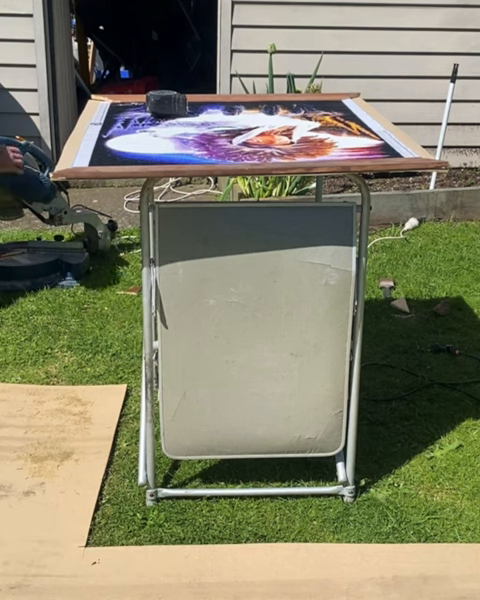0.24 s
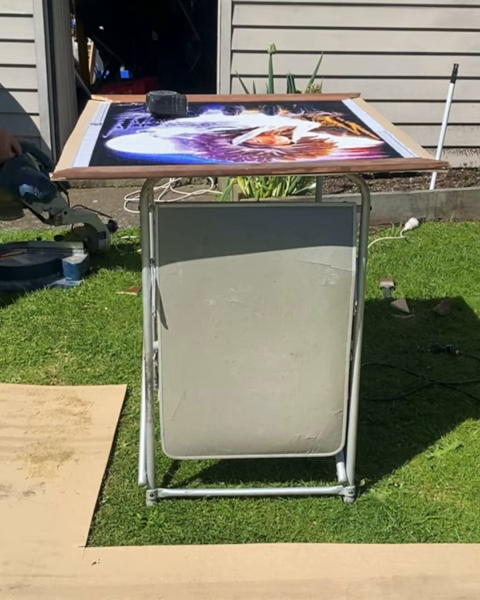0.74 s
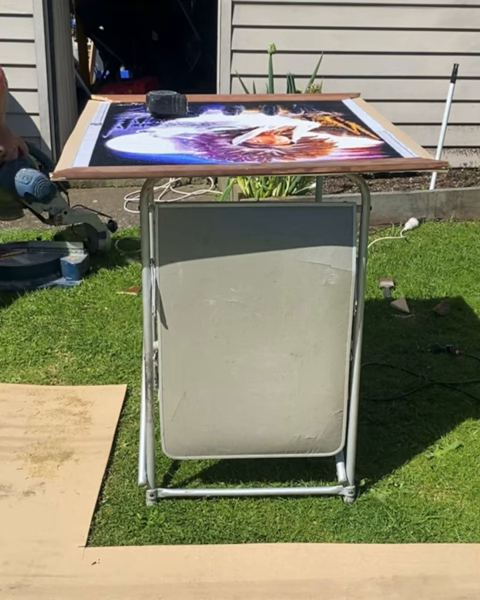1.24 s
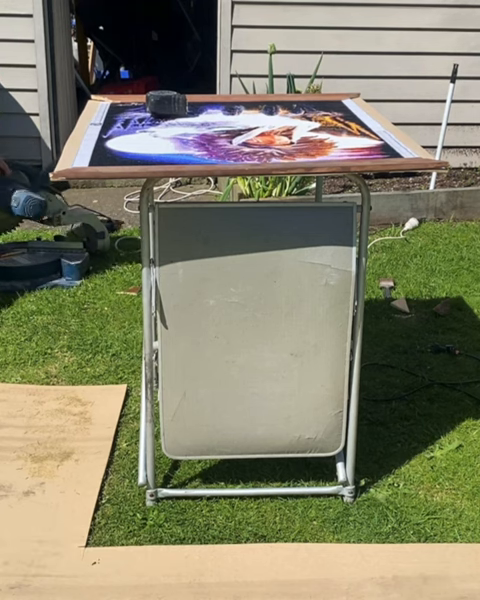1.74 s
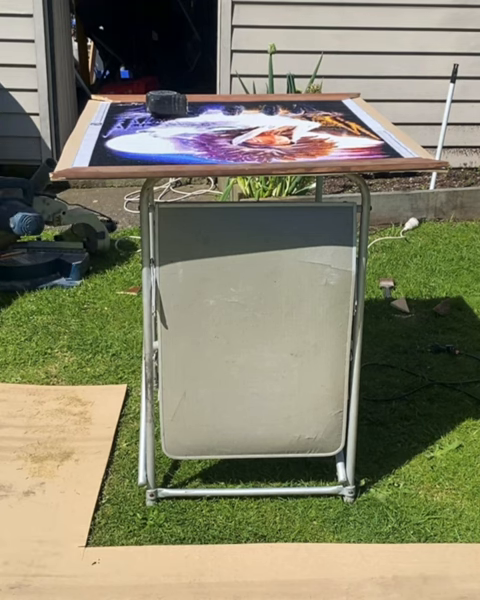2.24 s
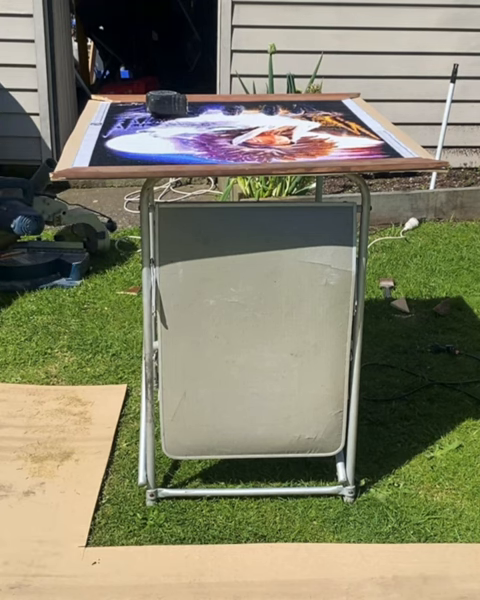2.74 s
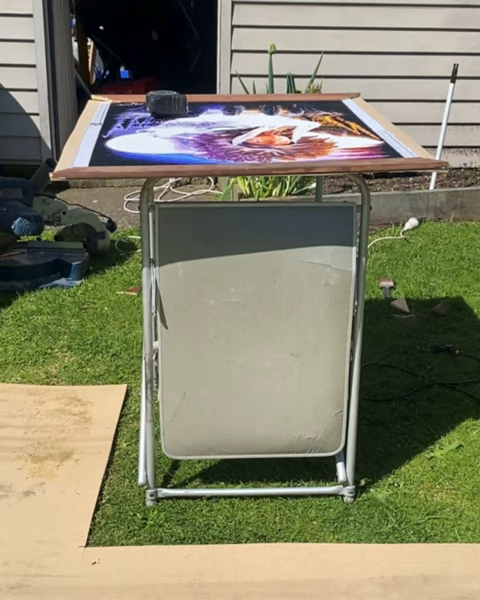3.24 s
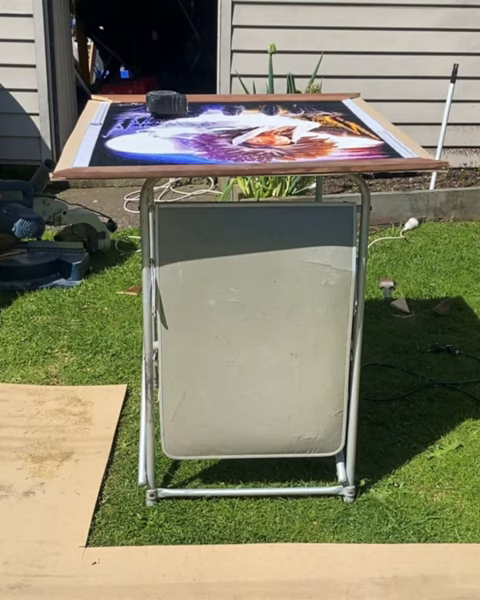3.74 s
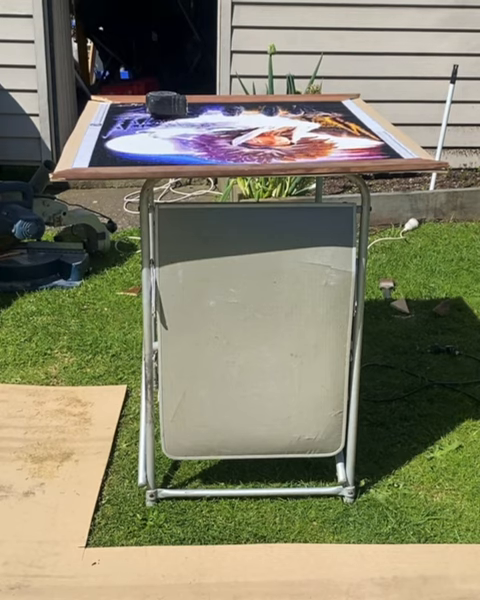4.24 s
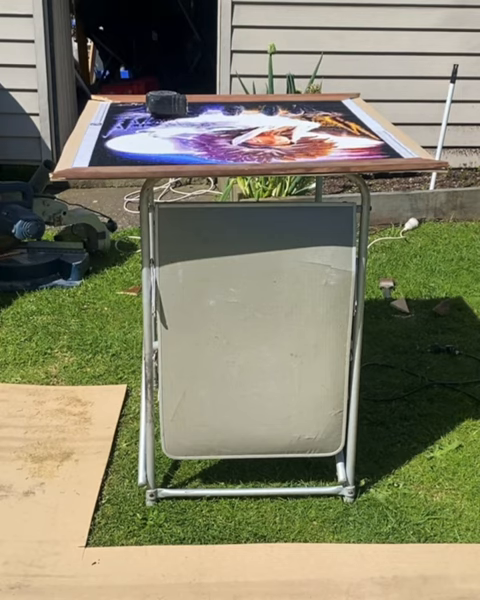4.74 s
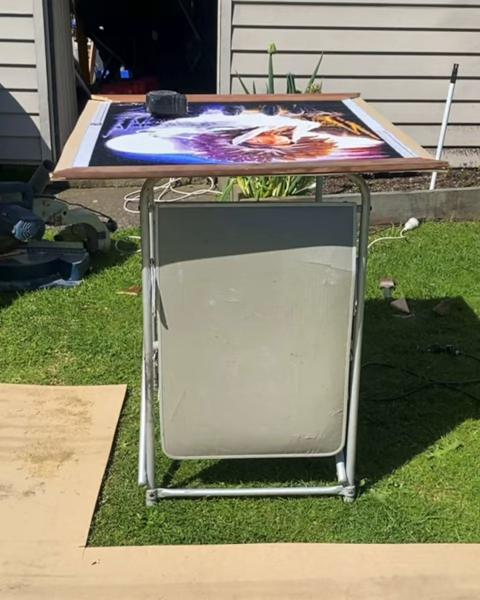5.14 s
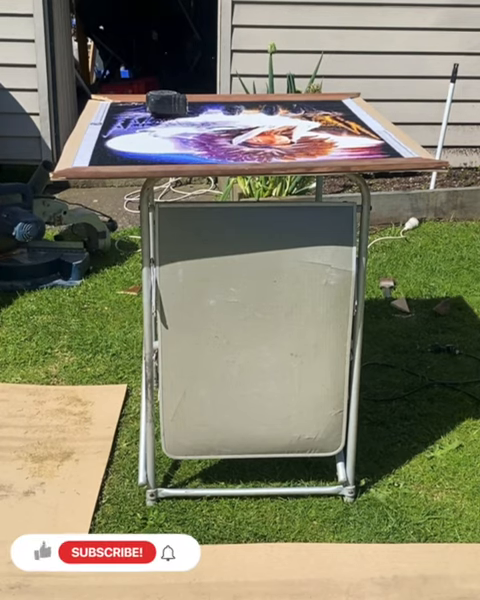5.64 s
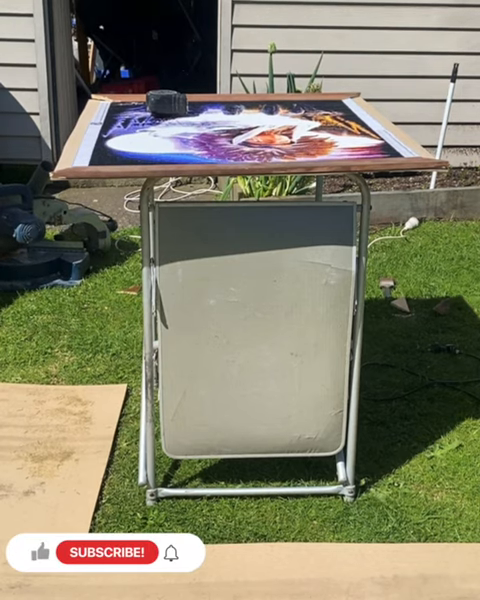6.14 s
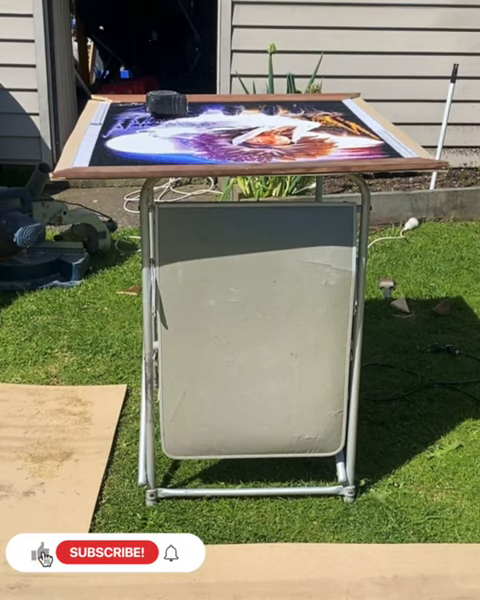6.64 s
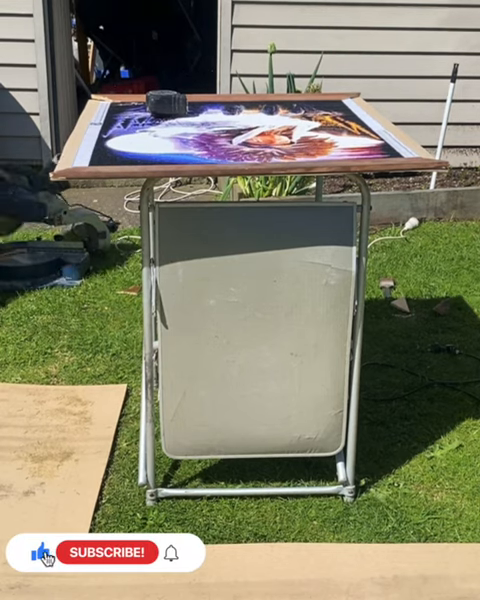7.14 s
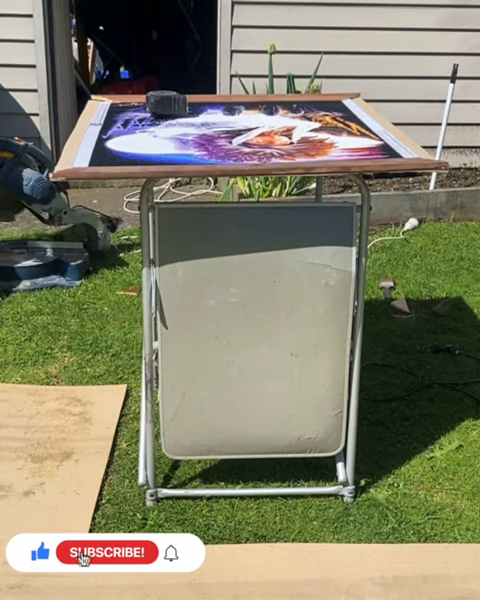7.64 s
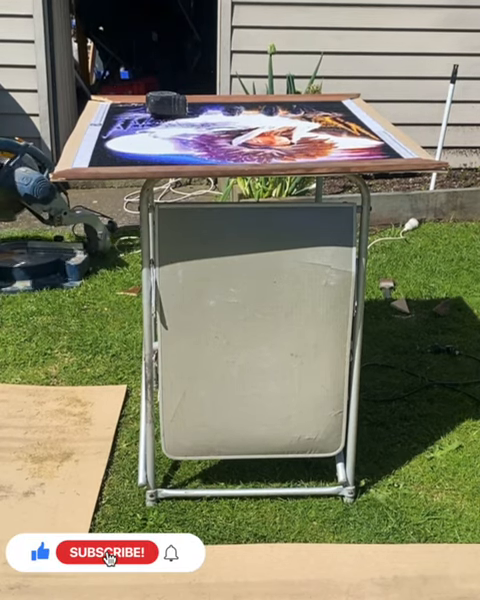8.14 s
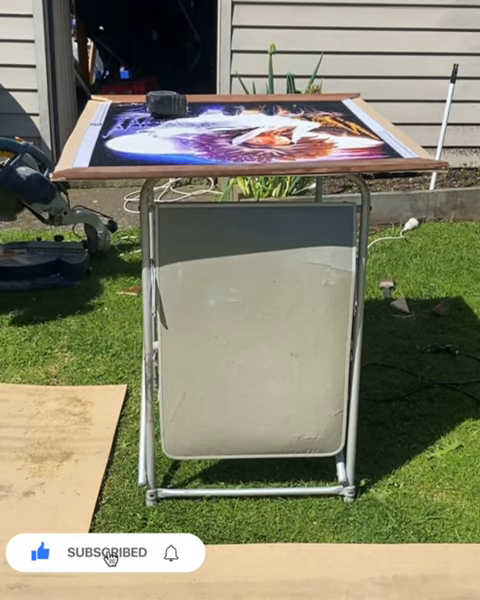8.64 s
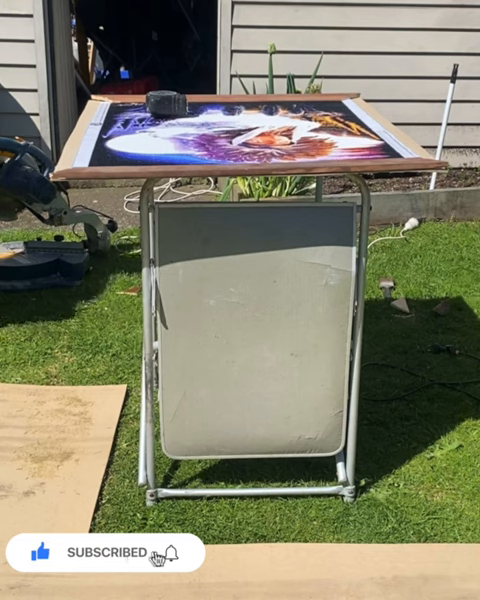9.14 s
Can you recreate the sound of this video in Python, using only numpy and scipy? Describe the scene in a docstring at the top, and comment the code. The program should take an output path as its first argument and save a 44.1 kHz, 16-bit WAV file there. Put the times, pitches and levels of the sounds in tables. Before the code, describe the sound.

A faint low hum and soft open air, then a saw arm slides and clacks twice with a short metallic ring. The electric motor kicks in with a rattling slam and rises steeply; toothy whine, rasping wood and shifting high squeals follow for about three seconds. After release, rattly gears pulse and slowly sink in pitch. Near stereo microphone in a yard, slight wall reflection.

```python
"""A mitre saw, to the left on a lawn: its motor kicks in and spins up, and the 40-tooth blade whines through
a strip of frame moulding and runs free; on release the gears coast down with a throb.
Beforehand its arm and guard clack twice as it is pulled down. Tones locked to the blade's and motor's turns,
coloured noise and decaying resonances make the saw; random tails make the answer of a shed wall.
Behind it a low background drone sinks while the saw cuts, with faint steady tones and stirring outdoor air."""
import sys
import numpy as np
from scipy import signal
from scipy.fft import rfft, irfft, next_fast_len
from scipy.io import wavfile
from scipy.ndimage import uniform_filter1d, map_coordinates

SR = 44100
rng = np.random.default_rng(int(sys.argv[2]) if len(sys.argv) > 2 else 0)


def wav_record(signal):
    """Record a signal, one row per channel, as 16-bit PCM in the file named by sys.argv[1]."""
    frames = np.transpose(np.atleast_2d(signal))
    bounded = np.clip(frames, -1, 1)
    # unit amplitude maps onto the largest positive 16-bit level
    quanta = np.round(bounded * 32767).astype(np.int16)
    wavfile.write(sys.argv[1], SR, quanta)


N = 413658
T = np.arange(N) / SR  # s
ON_S, OFF_S = 3.275, 7.04  # trigger pressed and released
TEETH, GEAR_RATIO, PINION = 40, 4.97, 9  # blade teeth, motor turns per blade turn, pinion teeth


def amp(db):
    """Logarithmic level: decibels to linear gain."""
    return 10 ** (np.asarray(db) / 20)


def unit(x):
    """Power normalisation: scale to rms 1."""
    return x / np.sqrt(np.mean(x ** 2) + 1e-20)


def steady(x):
    """Running normalisation: x is held at rms 1 from moment to moment."""
    return x / np.sqrt(np.abs(uniform_filter1d(x ** 2, size=4000)) + 1e-9)


def along(points, hz):
    """Logarithmic pitch axis: (frequency [Hz], value) points interpolated at hz."""
    f, v = np.transpose(points)
    return np.interp(np.log(hz + 1), np.log(f + 1), v)


def envelope(start, hold, attack, release):
    """Attack and decay: a straight rise, a hold and an exponential fall, all in seconds."""
    rise = np.clip((T - start) / attack, 0, 1)
    return rise * np.exp(-np.maximum(T - start - attack - hold, 0) / release)


def level(rows):
    """Amplitude modulation: (time [s], level [dB]) rows as a gain, faded out beyond their ends."""
    s, db = np.transpose(rows)
    gate = np.interp(T, [s[0] - .015, s[0], s[-1], s[-1] + .04], [0, 1, 1, 0])
    return gate * amp(np.interp(T, s, db))


def wobble(rate):
    """Slow random modulation: a smooth curve with rate knots a second."""
    coarse = T[::16]
    knots = rng.standard_normal(int(T[-1] * rate) + 4)
    return np.interp(T, coarse, map_coordinates(knots, [coarse * rate]))


def filtered(x, response):
    """Linear filtering: the spectrum of x times a response of frequency."""
    m = next_fast_len(N + SR // 4)
    return irfft(rfft(x, m) * response(np.fft.rfftfreq(m, 1 / SR)), m)[..., :N]


def resonance(hz, centre_hz, width_hz):
    """Resonance curve: gain 1 at its centre and a half at the edges of its width."""
    return 1 / (1 + ((hz - centre_hz) / (width_hz / 2)) ** 2)


def shaped(x, spectrum, lo_hz=20, hi_hz=18000):
    """Spectral colouring: x through one band of a spectrum, at rms 1."""
    def response(f):
        edges = (1 + (lo_hz / (f + 1)) ** 8) * (1 + (f / hi_hz) ** 8)
        return amp(along(spectrum, f)) / np.sqrt(edges)
    return unit(filtered(x, response))


def noise():
    """White noise: equal power at all frequencies."""
    return rng.standard_normal(N)


def tones(turns, orders, slip, rate, waver_db=2):
    """Order tones: lines on multiples of a turn, wavering in level and slipping in phase (radians)."""
    total = 0
    for k, db in orders:
        phase = 2 * np.pi * (np.round(k) * turns + rng.random()) + slip * wobble(rate)
        total = total + amp(db + waver_db * wobble(7.0)) * np.sin(phase)
    return unit(total)


def throb(turns, depth_db):
    """Periodic modulation: a swell once a turn, at rms 1."""
    return unit(amp(depth_db * np.cos(2 * np.pi * turns)))


def each_turn(turns, drift):
    """Cyclic excitation: a rough pattern repeats every turn and is renewed drift times a second."""
    pattern = rng.standard_normal((120, 480))
    return map_coordinates(pattern, [drift * T, 480 * turns], mode="grid-wrap", order=2)


def echoes(x, t60s, delay):
    """Reverberant decay: a stereo random tail in which each frequency dies at its own speed."""
    hz, t, z = signal.stft(rng.standard_normal((2, SR // 2)), SR, nperseg=256)
    decay = amp(-60 * t / along(t60s, hz)[:, None])
    tail = signal.istft(z * decay, SR, nperseg=256)[1]
    delayed = np.pad(x, (int(delay * SR), 0))[None]
    return signal.fftconvolve(delayed, tail / np.linalg.norm(tail[0]), axes=1)[:, :N]


def rattle(start, count, bands_db, step_db, gap, widen):
    """Repeated impact: (time, band levels) contacts; each gap is widen times the last, levels step."""
    return [(start + gap * sum(widen ** np.arange(k)), np.add(bands_db, k * np.array(step_db)))
            for k in range(count)]


def knocks(contacts, colour, t60s):
    """Impact excitation: each contact shakes three bands (thud, clack, tick) and leaves a soft tail."""
    t = T[:SR // 2]
    tail = amp(-21 - 60 * t / 0.36)
    attack = 1 - np.exp(-t / 0.0013)
    shake = np.zeros((3, N))  # power per band
    for s, bands_db in contacts:
        hits = [(amp(db) * (amp(-60 * t / t60) + tail) * attack) ** 2 for db, t60 in zip(bands_db, t60s)]
        shake[:, round(s * SR):][:, :len(t)] += hits
    bands = [(80, 1000), (1000, 3400), (3400, 18000)]  # Hz
    return sum(np.sqrt(power) * shaped(noise(), colour, *band) for power, band in zip(shake, bands))


# Spectrum of the outdoor air and low rumble: (frequency [Hz], relative level [dB])
YARD_SPECTRUM = [(25, -18.5), (69, -6), (125, -19.5), (621, -33.5), (1800, -46), (2750, -45), (3100, -55),
                 (7090, -67.5), (15000, -87)]
# Level of the low background drone: steady, then sinking while the saw cuts: (time [s], relative level [dB])
LOW_DRONE_LEVEL = [(0.0, -45), (4.31, -45), (6.58, -60), (9.38, -59)]
# Pitch of the low drone: (time [s], frequency [Hz])
DRONE_PITCH = [(1.3, 59.26), (2.3, 63.57)]
# Faint tones: (frequency [Hz], relative level [dB])
YARD_TONES = [(120, -52), (1464, -80)]


def yard(rumble_db=-2, drone_db=1.5, air_db=-55, side_db=-14, stir_db=-1.4):
    """Ambient noise: a low drone and faint tones, sinking together, sound under gently stirring outdoor air."""
    mid, side = [shaped(noise(), YARD_SPECTRUM, lo_hz=42, hi_hz=154.0) for _ in range(2)]
    drone_turns = np.cumsum(np.interp(T, *np.transpose(DRONE_PITCH))) / SR
    drone = amp(drone_db) * np.sin(2 * np.pi * drone_turns + .6 * wobble(6.6))
    # each side has its own air and shares some
    air = np.array([shaped(noise(), YARD_SPECTRUM, lo_hz=132) for _ in range(2)])
    air = air + 0.52 * shaped(noise(), YARD_SPECTRUM, lo_hz=132.8)
    upper = filtered(air, lambda f: f / (f + 1200))
    air = unit((air - upper) * amp(stir_db * wobble(14)) + upper * amp(stir_db * wobble(15)))
    hum = sum(amp(db + 2 * wobble(6)) * np.sin(2 * np.pi * hz * T + wobble(3.3)) for hz, db in YARD_TONES)
    low_level = level(LOW_DRONE_LEVEL)
    rumble = amp(rumble_db) * mid + amp(side_db) * np.array([side, -side])
    return low_level * (drone + rumble) + amp(air_db) * air + hum * low_level / low_level.max()


# Decay of the shed wall's answer: (frequency [Hz], time to fall 60 dB [s])
WALL_DECAY = [(150, 0.34), (1500, 0.62), (6000, 0.54), (14000, 0.0692)]


def wall(saw, wall_db=-17):
    """Reflection: the shed wall returns the saw 20 ms late as a tail."""
    return amp(wall_db) * echoes(saw, WALL_DECAY, delay=.02)


def scatter(saw, near_db=-9):
    """Scattering: nearby things return a short tail, opposite in sign at the two sides."""
    tail = echoes(saw, [(200, 0.069), (8000, 0.1573)], delay=.002)[0]
    return amp(near_db) * np.array([[1.], [-1.]]) * filtered(tail, lambda f: f / (f + 500))


# Knocks and rattles of arm, guard and trigger:
# (time [s], contacts [count], relative level [dB], thud over it [dB], tick over it [dB])
CLACKS = [(1.257, 1, -50.5, 0.5, -24), (1.365, 1, -35.5, 1, -11.5), (1.3984, 3, -32, 1.5, -15.5),
          (1.4422, 2, -11, -3.5, -0.5), (1.454, 1, -15, -7.5, 4.5), (1.4627, 2, -12, -9, -3.5),
          (1.673, 2, -12.5, -9, -4.5), (1.694, 4, -12.5, -12, -3.5), (1.724, 3, -14, -4.5, -8),
          (1.848, 1, -30, -1, -5.5), (1.9444, 1, -39.5, 4.5, -10), (2.104, 2, -37.5, 1, -4.5),
          (2.865, 1, -57, 0, -20.5), (3.155, 3, -57, 7, -23), (7.057, 2, -32.5, -13, 11)]


def clack_contacts():
    """Repeated impact: parts rattle against their stops, duller with each contact."""
    contacts = []
    for s, count, db, thud_db, tick_db in CLACKS:
        bands_db = (db + thud_db, db, db + tick_db)
        contacts += rattle(s, round(count), bands_db, step_db=(.7, -.3, -1.0), gap=.0075, widen=0.81)
    return contacts


# Modes of the arm and guard: (frequency [Hz], relative level [dB], time to fall 60 dB [s])
ARM_MODES = [(642, -9.5, .14), (990, -7, 0.13), (1255, 1.5, 0.11), (1450, -35.5, 1.9), (1950, -7, 0.313),
             (2780, -4.5, .15), (2870, -34, 1.2), (4500, -14, 0.34), (6570, -21.5, 0.15)]


def arm_ring(contacts):
    """Modal ringing: each contact sets off decaying sines, slightly varied in pitch and level."""
    t = T[:SR // 2]
    ring = np.zeros(N)
    for s, bands_db in contacts:
        modes = sum(amp(db + rng.normal(0, 1.0) - 60 * t / t60)
                    * np.sin(2 * np.pi * hz * rng.normal(1, .002) * t) for hz, db, t60 in ARM_MODES)
        ring[round(s * SR):][:len(t)] += amp(bands_db[1]) * modes
    return ring


# Colour of the arm's contacts and sliding: (frequency [Hz], relative level [dB])
CONTACT_SPECTRUM = [(100, -18), (280, -22.5), (450, -14.5), (900, -11), (1400, -7.5), (1750, -12.5),
                    (2700, -10.5), (3250, -14.5), (4500, -9.5), (5850, -13), (6600, -4.5), (7600, -18.5),
                    (11000, -23), (15500, -40.5)]
# The arm slides on its rails: (time [s], length [s], rub level [dB], hiss level [dB])
SLIDES = [(0.007, 0.13, -68, -72.5), (.38, 0.09, -76, -86), (1.251, 0.077, -56.5, -75.5),
          (1.36, .05, -42.5, -46.5)]


def arm_slides():
    """Sliding friction: gritty noise in a low rub and a high hiss as the arm moves on its rails."""
    grit = noise() * amp(2.7 * wobble(160))
    rub = shaped(grit, CONTACT_SPECTRUM, lo_hz=299.6, hi_hz=1550)
    hiss = shaped(grit, CONTACT_SPECTRUM, lo_hz=2306)
    return sum(envelope(s, length, attack=0.007, release=0.037) * (amp(rub_db) * rub + amp(hiss_db) * hiss)
               for s, length, rub_db, hiss_db in SLIDES)


def handling(knock_db=-4, ring_db=-13):
    """Impact and friction: the arm slides, rattles against its stops and rings."""
    contacts = clack_contacts()
    knocking = knocks(contacts, CONTACT_SPECTRUM, t60s=(.08, .06, .045))
    return amp(knock_db) * knocking + amp(ring_db) * arm_ring(contacts) + arm_slides()


def base(thunk_s=1.733, thunk_db=-5, thunk_hz=639, t60=0.13):
    """Delayed resonance: the heavy base answers the second clack with a low ring that builds up slowly."""
    t = np.maximum(T - thunk_s, 0)
    swell = amp(thunk_db - 60 * t / t60) * (1 - np.exp(-t / .02)) ** 2
    return swell * np.sin(2 * np.pi * thunk_hz * t + .4 * wobble(90))


# Colour of the jolted motor housing: (frequency [Hz], relative level [dB])
HOUSING_SPECTRUM = [(88, -48.5), (150, -22), (300, -25.5), (818, -2), (3540, -23.5), (7210, -25.5),
                    (8410, -38), (15000, -48)]
# Mains hum: (frequency [Hz], relative level [dB])
MAINS_TONES = [(100, -10), (150, 1), (200, -20)]


def kick(hum_db=-40, swell_db=-32, swell_s=3.585, swell_width_s=0.046):
    """Impact and inrush: gear teeth slam at switch-on; mains hums, swelling once, while current is high."""
    contacts = rattle(ON_S, count=9, bands_db=(-15, -14.5, -16), step_db=(-.45, -1.2, -2.1),
                      gap=0.0095, widen=1.13)
    current = amp(hum_db) * envelope(ON_S, hold=0.21, attack=.04, release=0.5)
    current = current + amp(swell_db) * np.exp(-((T - swell_s) / swell_width_s) ** 2)
    mains = sum(amp(db) * np.sin(2 * np.pi * hz * T + 0.25 * wobble(7.4)) for hz, db in MAINS_TONES)
    return knocks(contacts, HOUSING_SPECTRUM, t60s=(.11, .07, .06)) + current * mains


# Blade speed under power: (time [s], speed [turns/s])
POWERED_SPEED = [(3.27, 8), (3.35, 29), (3.45, 42), (3.65, 54), (3.85, 59.4), (4.0, 62.7), (4.2, 66.4),
                 (4.4, 68.65), (4.6, 70.3), (4.8, 71.3), (5.0, 71.85), (5.25, 72.1), (5.7, 71.4),
                 (6.6, 71.6)]


def spin(coast):
    """Rotational phase: powered speed times the coasting share, summed into blade turns."""
    return np.cumsum(np.interp(T, *np.transpose(POWERED_SPEED)) * coast) / SR


# Colour of fan, brushes and roar: (frequency [Hz], relative level [dB])
RUNNING_SPECTRUM = [(130, -5.5), (260, -20), (400, -5.5), (800, -2.5), (1100, -5), (1400, -3.5),
                    (1750, -6.5), (2400, 2.5), (2900, 1.5), (3600, -7), (4200, -8), (5120, -6.5),
                    (5750, -13.5), (7000, -8), (8000, -17), (15500, -26)]
# Armature lines: (multiple of the motor's turn [-], relative level [dB])
ARMATURE_ORDERS = [(1, 1.5), (2, 6.5), (3, -6), (5, 0), (12, 5)]


def motor(turns, air_db=-33, rasp_db=-26.5, line_db=-6, grain_db=-7, surge_db=14, surge_s=0.026,
          air_fade_db_per_s=2.5, rasp_fade_db_per_s=1.76, growl_db=-43, growl_hz=805, growl_width_hz=130):
    """Flow noise and shaft orders: air surges, then eases with the rasp; lines and growl grow with speed."""
    powered_s = np.clip(T, ON_S, OFF_S) - ON_S
    running = np.clip((T - ON_S) / 0.019, 0, 1)
    coasting = np.clip((T - OFF_S) / 0.37, 0, 1)
    surge = surge_db * np.exp(-powered_s / surge_s)
    air = amp(air_db + surge - air_fade_db_per_s * powered_s - 4.6 * coasting)
    rasp = amp(rasp_db - rasp_fade_db_per_s * powered_s - 6.4 * coasting)
    shaft = GEAR_RATIO * turns
    fan = shaped(noise(), RUNNING_SPECTRUM, lo_hz=158, hi_hz=1030)
    grain = noise() + amp(grain_db) * each_turn(turns, drift=5)
    brushes = shaped(grain * throb(shaft, depth_db=1.5), RUNNING_SPECTRUM, lo_hz=1090)
    # square of the speed relative to its peak
    pull = (np.gradient(turns) * SR / np.max(np.transpose(POWERED_SPEED)[1])) ** 2
    lines = pull * tones(shaft, ARMATURE_ORDERS, slip=.3, rate=20)
    # the growl resonates in the housing
    growl = steady(filtered(noise(), lambda f: resonance(f, growl_hz, growl_width_hz) ** 2))
    growl = pull * (1 - coasting) * growl * amp(1.6 * wobble(12))
    return running * (air * (fan + amp(line_db) * lines) + rasp * brushes + amp(growl_db) * growl)


# Resonances of the gear case: (frequency [Hz], relative level [dB])
GEARCASE_SPECTRUM = [(300, -15), (520, 0.5), (760, -20), (1050, 5), (1500, 9.5), (1720, -5), (2400, 6.5),
                     (2800, 15.5), (3400, 4), (4300, -1), (5380, 1), (5800, -10), (6300, 5), (6900, -3.5),
                     (7600, 3), (8300, -11), (11000, -14.5), (15500, -28)]
# Depth of the gears' throb: (time [s], share of full depth [-])
THROB_DEPTH = [(7.7, .55), (8.42, 1.0), (8.75, .6), (9.1, .4)]
# Loudest slams of the freed gears: (time [s], relative level [dB])
SLAMS = [(7.314, -27), (7.341, -26), (7.372, -28), (7.43, -27), (7.51, -25.5), (7.548, -26), (7.578, -29),
         (7.605, -25), (7.709, -24), (7.742, -26), (7.771, -26.5)]


def gears(turns, slowed, drone_db=-36, hoot_db=-41, case_db=-34, mesh_db=-45, overtone_db=-38,
          resonance_db=10, resonance_hz=2850, width_hz=160, chatter_db=-32, chatter_s=7.11,
          case_slowing_db=14, chatter_slowing_db=7, slam_tick_db=-6, hum_db=-54, sing_hz=7390, sing_db=-10):
    """Backlash impact: unloaded gears slam, then throb about every second blade turn, blurring as they slow.

    Each slowing_db is lost per octave of speed."""
    shaft = GEAR_RATIO * turns
    beat = .52 * turns + .06 * wobble(7)
    settled = np.interp(T, *np.transpose(THROB_DEPTH))
    hoot = tones(shaft, [(4, 0), (5, -4), (6, -4)], slip=.95, rate=80)
    hoot = unit(filtered(hoot, lambda f: 1 / np.sqrt(1 + (f / 1580) ** 20)))
    mesh = tones(shaft, [(PINION, 0), (PINION + 1, -6), (PINION + 3, -12)], slip=.8, rate=70)
    # the mesh tone flares as it falls through the blade's resonance
    mesh = filtered(mesh, lambda f: 1 + amp(resonance_db) * resonance(f, resonance_hz, width_hz))
    overtone = tones(shaft, [(2 * PINION, 0), (2 * PINION + 1, -7), (2 * PINION + 2, -7)], slip=1.15, rate=130)
    overtone_colour = [(4200, -16), (4600, -1), (5000, -3), (5350, -1), (5600, -12)]  # (Hz, dB)
    overtone = filtered(overtone, lambda f: amp(along(overtone_colour, f)))

    low = amp(drone_db) * shaped(noise(), GEARCASE_SPECTRUM, lo_hz=430, hi_hz=1790) + amp(hoot_db) * hoot
    mid = amp(case_db) * shaped(noise(), GEARCASE_SPECTRUM, lo_hz=1800, hi_hz=3120)
    mid = amp(-case_slowing_db * slowed) * mid * unit(amp(2 * wobble(35)))  # uneven
    body = low * throb(beat, depth_db=5 * settled) + mid * throb(beat, depth_db=7 * settled)
    glide = (amp(overtone_db) * overtone + amp(mesh_db) * mesh) * throb(beat, depth_db=6 * settled)
    hum = amp(hum_db) * np.sin(2 * np.pi * shaft + wobble(28)) * 4 ** -slowed

    ticks = shaped(noise() + each_turn(turns, drift=8), GEARCASE_SPECTRUM, lo_hz=3950)
    singing = steady(filtered(noise(), lambda f: resonance(f, sing_hz, 200) ** 2))
    chatter = amp(chatter_db - chatter_slowing_db * slowed) * (ticks + amp(sing_db) * singing)
    chatter = chatter * throb(beat, depth_db=3.2 * settled)
    slams = sum(amp(db) * envelope(s, hold=0.005, attack=0.002, release=0.004) for s, db in SLAMS)
    slams = slams * (steady(mesh) + amp(slam_tick_db) * ticks)
    freed = np.clip((T - OFF_S) / 0.22, 0, 1)
    return freed * (body + glide + hum) + np.clip((T - chatter_s) / 0.016, 0, 1) * chatter + slams


# The blade rubs the side of the cut: (multiple of the blade's turn [-], relative level [dB])
RUB_ORDERS = [(2, -4), (3, 2), (4, 3)]


def kerf(turns, rub_db=-49, rub_s=6.68):
    """Rotating friction: once through, the blade rubs the side of the cut with a low burr."""
    burr = tones(turns, RUB_ORDERS, slip=.5, rate=25)
    return amp(rub_db) * burr * envelope(rub_s, hold=0.15, attack=0.03, release=.03)


# Grazes of the blade plate: (time [s], level [dB])
GRAZES = [(4.04, -23.5), (4.125, -23.5), (4.41, -27), (7.125, -25.5)]


def plate(plate_hz=2805):
    """Plate resonance: each graze sets the blade's plate ringing briefly."""
    ring = np.sin(2 * np.pi * plate_hz * T + 1.1 * wobble(130))
    return ring * sum(amp(db) * envelope(s, hold=0.021, attack=0.0057, release=0.064) for s, db in GRAZES)


# Tooth lines driving the blade: (multiple of the blade's turn [-], relative level [dB])
SHRIEK_ORDERS = [(58, 19.5), (59, 11.5), (60, 25.5), (66, 11), (75, 7), (78, 13.5), (80, 10), (89, 4.5),
                 (98, 2), (101, 1)]
# Resonances of the blade in the cut: (frequency [Hz], width [Hz], relative level [dB])
BLADE_MODES = [(4240, 510, 13), (5380, 310, -0.5), (5720, 310, -2.5), (6366, 220, 4.5), (7160, 540, 10)]
# Swell of those five resonances: (time [s], then five relative levels [dB])
SHRIEK_LEVEL = [(4.3, -51, -52, -53, -51, -57), (4.57, -42.5, -37, -39, -31.5, -44),
                (4.65, -38, -25.5, -33, -34.5, -43), (4.78, -46, -33, -40, -40, -45),
                (5.14, -54, -38, -34, -37, -52), (5.33, -64, -32, -29, -32.5, -37.5),
                (5.49, -36, -36, -36, -34, -39.5), (5.63, -42, -25.5, -26, -33, -35.5),
                (5.96, -44, -35, -33, -39.5, -44.5), (6.18, -43, -45, -25, -37.5, -37),
                (6.56, -53, -37, -38, -46, -48), (6.69, -55, -56, -55, -52, -53)]
# Single teeth catch: (time [s], length [s], multiple of the blade's turn [-], level [dB])
SQUEAKS = [(3.847, 0.039, 100, -25.5), (3.85, 0.14, 81, -35), (3.9, .08, 120, -34), (4.5, .06, 100, -35),
           (4.928, 0.069, 88, -29), (5.267, 0.099, 100, -45), (6.548, 0.087, 101, -35)]


def shriek(turns, shriek_db=-1, pattern_db=3):
    """Forced resonance: teeth drive the blade's modes, which swell in turn; some teeth catch and squeak."""
    teeth = tones(turns, SHRIEK_ORDERS, slip=.5, rate=55, waver_db=3.5)
    drive = teeth + amp(pattern_db) * each_turn(turns, drift=11) + noise()
    s, *levels = np.transpose(SHRIEK_LEVEL)
    rings = 0
    for (hz, width, db), swell in zip(BLADE_MODES, levels):
        ring = steady(filtered(drive, lambda f: resonance(f, hz, width) ** 2))
        rings = rings + amp(db) * level(np.transpose([s, swell])) * ring
    slip = 1.15 * wobble(170)
    squeaks = 0
    for start, length, k, db in SQUEAKS:
        gain = amp(db) * envelope(start, length, attack=.015, release=.025)
        squeaks = squeaks + gain * np.sin(2 * np.pi * np.round(k) * turns + slip)
    return amp(shriek_db) * rings * throb(turns, depth_db=-0.5) + squeaks


# Lower lines of the moulding: (multiple of the blade's turn [-], relative level [dB])
WOOD_ORDERS = [(3, -8.5), (10, 1), (11, -0.5), (13, -0.5), (14, 5.5), (15, 0), (16, 0), (25, 3)]
# Level of the moulding's own drone while the blade is deep in it: (time [s], level [dB])
WOOD_LEVEL = [(4.55, -46), (4.8, -34.5), (5.1, -31), (5.7, -35.5), (6.55, -41)]


def moulding(turns, pattern, judder, roar_db=-30.0):
    """Sounding board: the moulding roars and sounds the lower orders, most when the blade is deep in it."""
    depth = envelope(3.36, hold=0.72, attack=1.0, release=0.64)
    drone = tones(turns, WOOD_ORDERS, slip=.2, rate=40)
    roar = shaped(.5 * pattern + noise(), RUNNING_SPECTRUM, lo_hz=240, hi_hz=1750)
    return level(WOOD_LEVEL) * judder * drone + amp(roar_db) * depth * roar


# Colour of teeth in the wood: (frequency [Hz], relative level [dB])
RIP_SPECTRUM = [(400, -55), (750, 15), (1400, -6.5), (1950, -16.5), (2400, -4.5), (3100, -3.5),
                (3500, -4.5), (4200, -4), (5700, -8.5), (7300, -5.5), (8200, -10), (10200, -22),
                (10600, -7), (12600, -22), (15500, -17.5)]
# How hard the teeth bite: (time [s], relative level [dB])
BITE_LEVEL = [(3.78, -44), (3.88, -30), (4.13, -35.5), (4.33, -33.5), (4.61, -30), (5.05, -28.5),
              (5.65, -25), (5.94, -34), (6.22, -28), (6.51, -34.5), (6.55, -29), (6.72, -55)]
# Lines around half the tooth rate: (multiple of the blade's turn [-], relative level [dB])
HOWL_ORDERS = [(17, 2), (18, 7), (19, -2), (20, 5), (21, -8.5)]
# Level of that howl: (time [s], relative level [dB])
HOWL_LEVEL = [(3.85, -37), (3.99, -26.5), (4.26, -49), (4.36, -25), (4.56, -20), (4.73, -28.5), (5.4, -33),
              (5.65, -26.5), (5.78, -33.5), (6.17, -22), (6.52, -31.5), (6.64, -55)]
# Resonance that the howl sweeps through: (frequency [Hz], relative level [dB])
HOWL_SPECTRUM = [(1100, -28), (1250, -5), (1390, 19.5), (1520, -18)]
# Lines around the tooth rate: (multiple of the blade's turn [-], relative level [dB])
WHINE_ORDERS = [(38, 6), (39, 3.4), (40, 10), (42, 3.6)]
# Level of that whine: (time [s], relative level [dB])
WHINE_LEVEL = [(3.78, -28), (4.0, -20), (4.3, -27), (4.83, -21.5), (5.23, -37), (5.52, -21.5), (5.76, -31),
               (6.46, -26.5), (6.7, -46)]


def cutting(turns, pattern_db=-3.0, chips_db=0.0, howl_db=-1, whine_db=-6, tear_db=-4):
    """Periodic cutting force: the same uneven teeth bite every turn, a comb of lines over torn chips."""
    # the bite pattern of one turn drifts as the blade sinks in
    pattern = each_turn(turns, drift=5)
    bites = throb(TEETH * turns, depth_db=6.0) * throb(turns, depth_db=1.5)
    ripping = amp(pattern_db) * shaped(pattern * bites, RIP_SPECTRUM, lo_hz=1740)
    ripping = ripping + amp(chips_db) * shaped(noise() * bites, RIP_SPECTRUM, lo_hz=2900)
    # the grain of the wood makes the tones judder
    judder = unit(amp(.8 * (wobble(35) + wobble(160))))
    # alternately bevelled teeth howl at half the tooth rate and whine at the full rate
    half = tones(turns, HOWL_ORDERS, slip=.14, rate=45)
    howl = steady(shaped(half, HOWL_SPECTRUM)) * judder
    full = tones(turns, WHINE_ORDERS, slip=.3, rate=45)
    tear = shaped((pattern + noise()) * bites, RIP_SPECTRUM, lo_hz=2320, hi_hz=2730)
    whine = amp(whine_db) * full * judder + amp(tear_db) * tear
    board = moulding(turns, pattern, judder)
    tonal = amp(howl_db) * level(HOWL_LEVEL) * howl + level(WHINE_LEVEL) * whine
    return level(BITE_LEVEL) * ripping + board + tonal


# The saw at the two ports: (frequency [Hz], left over right [dB], left lead [samples])
PORTS = [(200, -2, 6), (397, 1.5, 14.8), (775, 6.5, 10), (1260, 2, 2.8), (2150, 2.5, 6.6), (2784, 5, 2.05),
         (3403, 5, 6.88), (8640, -1.5, 6.66), (10760, 1.5, 4.82), (14000, -1, 3.84)]


def at_ports(saw):
    """Stereo differences: level and arrival time differ between the ports with frequency."""
    hz, lean_db, lead = np.transpose(PORTS)
    sides = np.array([[.5], [-.5]])

    def response(f):
        advance_s = sides * np.interp(f, hz, lead) / SR
        return amp(sides * np.interp(f, hz, lean_db)) * np.exp(2j * np.pi * f * advance_s)
    # sunk in the wood, the blade is heard from nearer the middle
    return filtered(saw, response) * amp(-2.2 * sides * envelope(5.4, hold=0.41, attack=0.59, release=0.2))


def scene(coast_s=5.15):
    """Superposition: the saw, coasting exponentially from OFF_S, reaches the left first; wall and yard add."""
    coast = np.exp(-np.maximum(T - OFF_S, 0) / coast_s)
    turns = spin(coast)
    saw = handling() + base() + kick() + motor(turns) + gears(turns, slowed=-np.log2(coast))
    saw = saw + kerf(turns) + plate() + shriek(turns) + cutting(turns)
    return at_ports(saw) + scatter(saw) + wall(saw) + yard()


def record(dry, top_hz=15950):
    """Band limiting: a straight 300 Hz slope centred on top_hz ends the spectrum."""
    return filtered(dry, lambda hz: np.clip((top_hz - hz) / 300 + .5, 0, 1))


dry = scene()
out = record(dry)
wav_record(out)
```